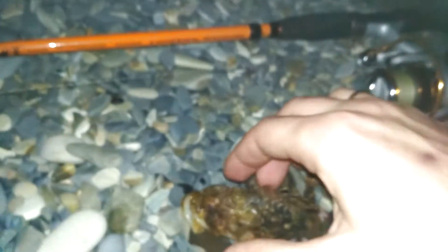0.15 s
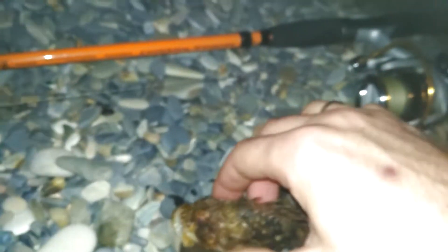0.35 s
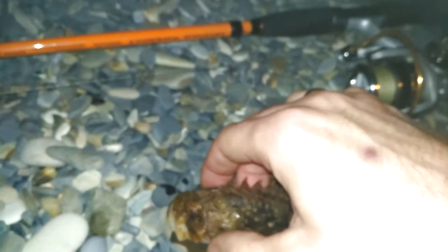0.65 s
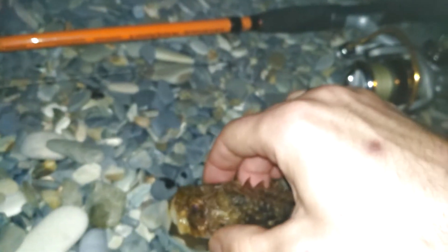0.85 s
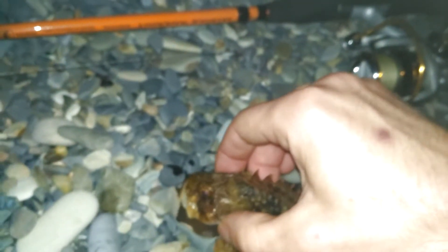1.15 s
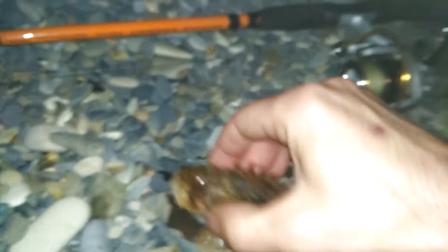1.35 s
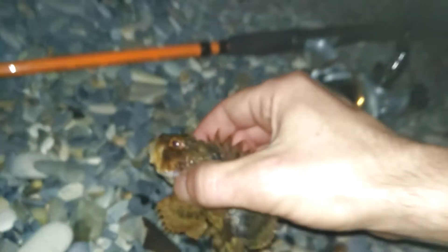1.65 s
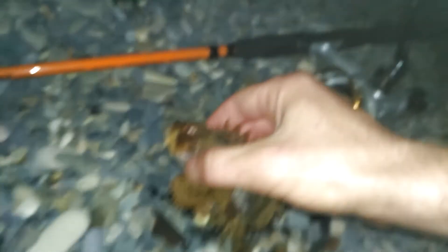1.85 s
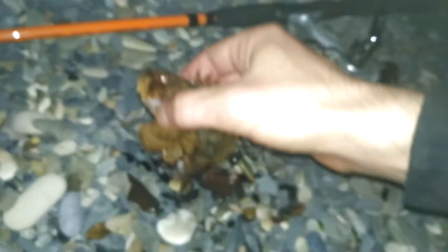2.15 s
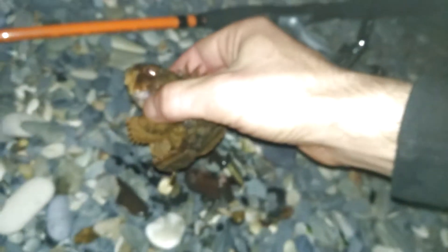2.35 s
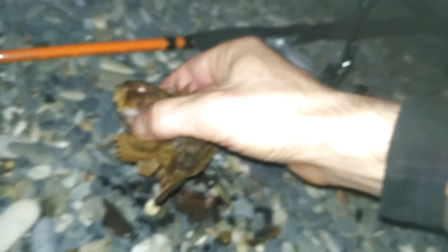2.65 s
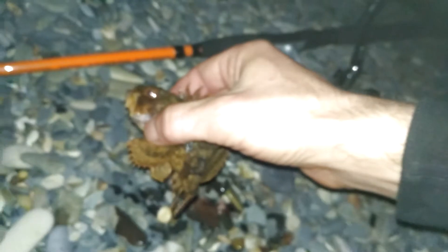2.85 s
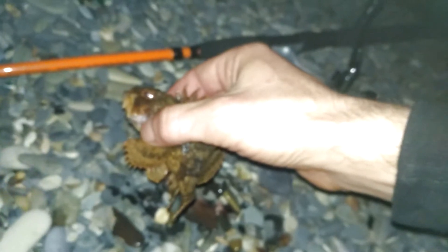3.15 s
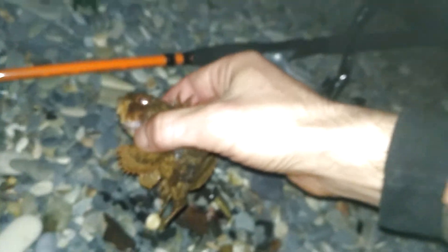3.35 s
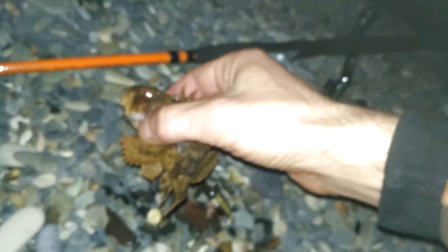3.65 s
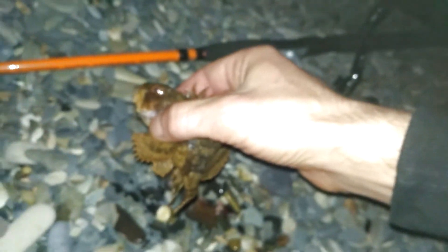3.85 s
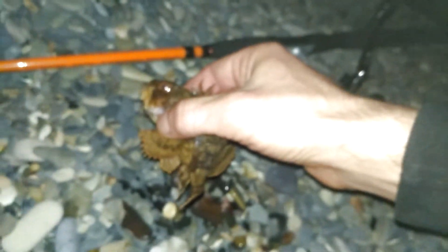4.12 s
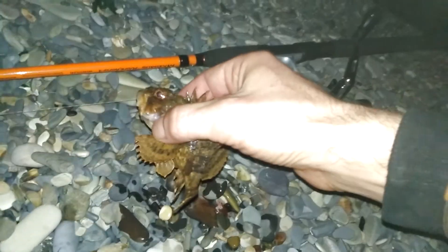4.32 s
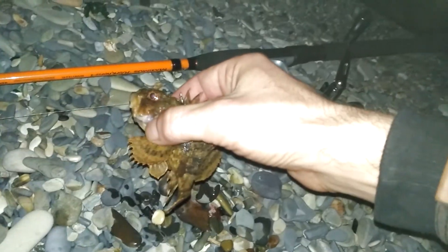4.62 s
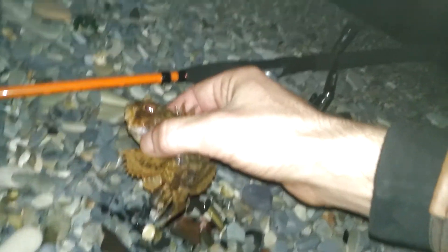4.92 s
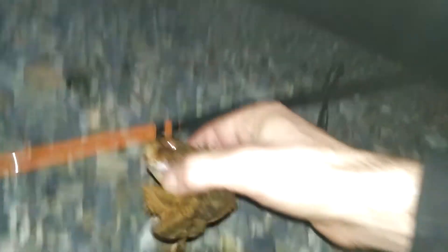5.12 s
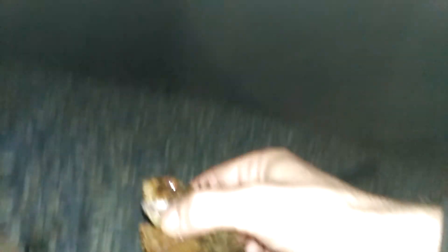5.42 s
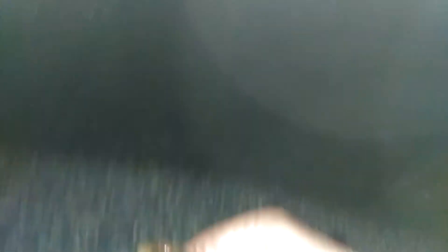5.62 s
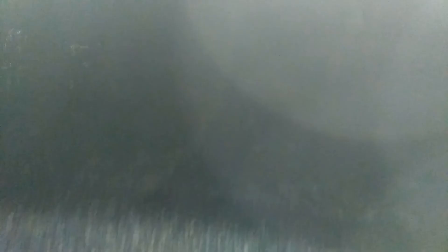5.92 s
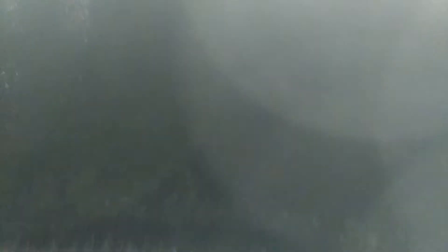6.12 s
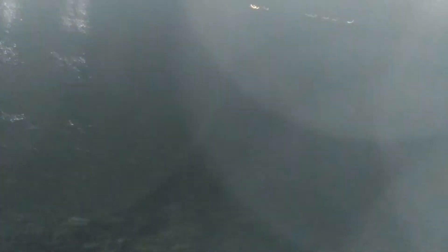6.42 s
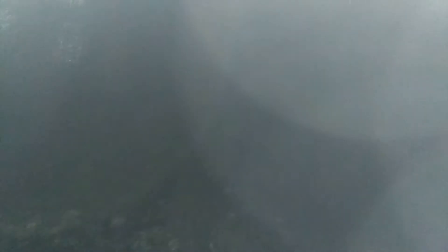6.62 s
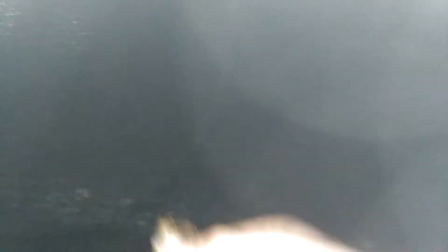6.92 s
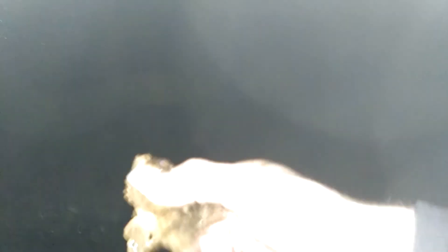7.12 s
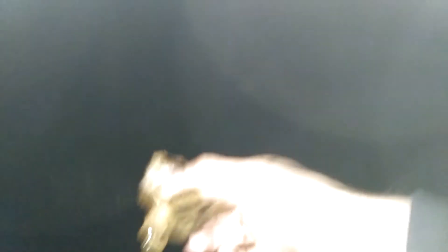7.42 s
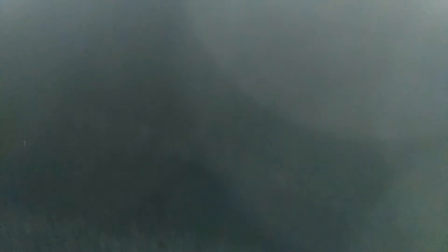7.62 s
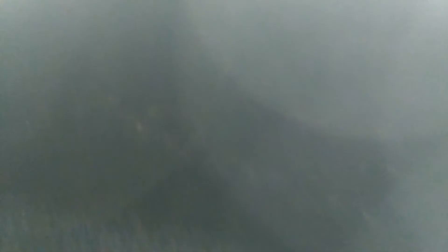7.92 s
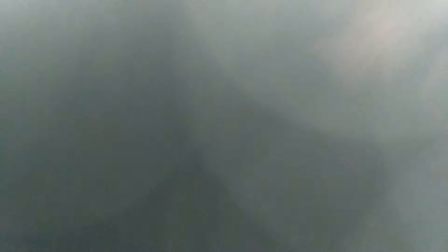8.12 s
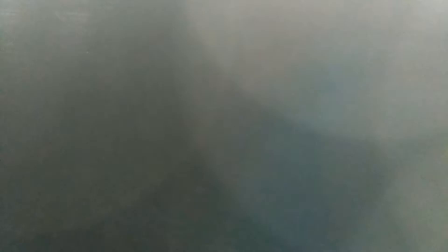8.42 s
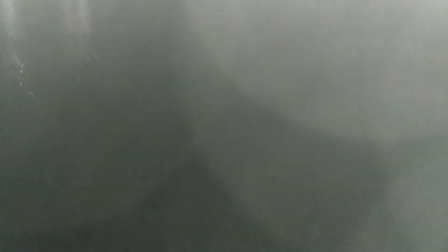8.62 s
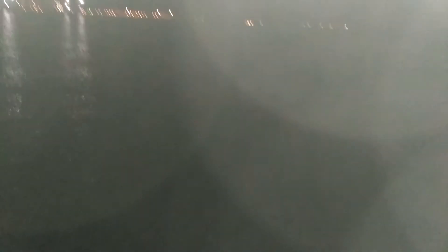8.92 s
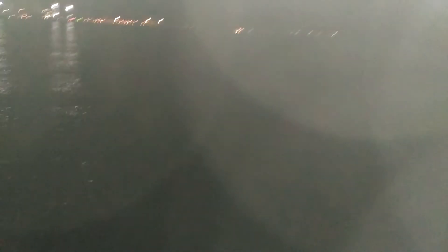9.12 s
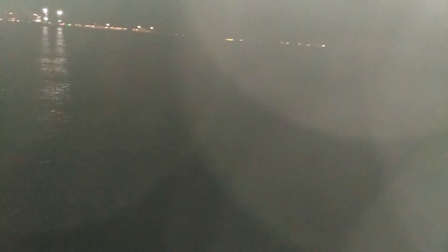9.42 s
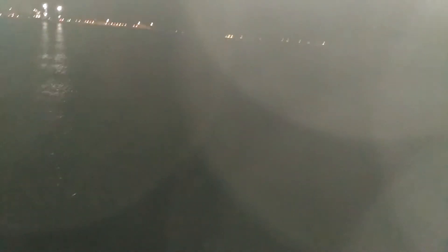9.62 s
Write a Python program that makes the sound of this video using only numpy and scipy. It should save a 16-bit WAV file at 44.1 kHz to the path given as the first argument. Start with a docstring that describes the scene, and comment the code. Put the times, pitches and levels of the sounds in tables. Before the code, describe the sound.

Small waves break close by and drain through pebbles, each a bright, crackling wash of foam with hollow clacks and bubbly plops. Quiet gaps between them hold faint far surf and a low breeze, thinned by noise suppression. The second wave is stronger; the last run is longest, with the heaviest wind bumps on the phone microphone outdoors, ending in a little splash.

```python
"""Night on a pebble beach, heard by a hand-held phone: small waves break and fizz away over steady far surf.
First come a little wash, some pebble ticks and a wave at 1.8 s; a lull, then a stronger wave at 4.5 s
rattles the stones. Puffs of wind bump the microphone, small splashes follow from 6.2 s, then a long run of
waves from 7.1 s with clacking stones and the strongest puffs; it ends on a few ticks and a splash.
Noise makes the water and ringing tones the stones; a noise suppressor holds down steady sound by band."""
import sys
import numpy as np
from scipy import signal
from scipy.fft import rfft, irfft, next_fast_len
from scipy.io import wavfile
from scipy.ndimage import uniform_filter1d, map_coordinates

SR = 44100
rng = np.random.default_rng(int(sys.argv[2]) if len(sys.argv) > 2 else 0)


def to_wav(s):
    """Save 16-bit WAV."""
    ch = np.atleast_2d(s).T  # columns
    pcm = np.round(np.clip(ch, -1, 1) * 32767)  # PCM
    wavfile.write(sys.argv[1], SR, pcm.astype(np.int16))


N = 430416

# Tone colours, each as (frequency [Hz], relative level [dB])
# far surf
SURF_COLOUR = [(150, -22.5), (250, -4), (547, -0.5), (748, -8.5), (1380, -15.5), (1500, -19.5), (2280, -19),
               (5250, -27.5), (7980, -23.5), (14400, -16.5), (16000, -46)]
# low rumble of the breeze
RUMBLE_COLOUR = [(15, -51.5), (25, -5), (75, 0), (134, -6), (172, -4.5), (263, -14), (286, -15), (400, -19),
                 (520, -56), (880, -120)]
# gurgling air pockets
GURGLE_COLOUR = [(220, -41), (330, -4), (600, 1.5), (800, -2.5), (1100, -15)]
# tumbling water
WASH_COLOUR = [(560, -47), (800, -7), (1200, 2), (1900, 2.5), (2700, -24.5)]
# dragged gravel
RATTLE_COLOUR = [(1400, -26), (2100, -2), (2700, -2.5), (3700, -3.5), (5000, -6), (6200, -11.5)]
# draining water
HISS_COLOUR = [(4500, -5), (5400, -0.5), (7000, -3), (9300, -0.5), (10000, -36.5)]
# foam
FIZZ_COLOUR = [(9000, -26), (9600, -0.5), (11000, 2), (11900, -0.5), (12500, -29)]
# finest foam
SPRAY_COLOUR = [(11500, -29.5), (12100, -2), (14000, -3), (16000, -5.5)]

# strength of the breeze: (time [s], rumble level [dB])
BREEZE_LEVEL = [(0.0, -62), (0.46, -63), (1.41, -60.5), (1.9, -61), (2.69, -61), (3.07, -61.5), (3.42, -59),
                (3.86, -63), (4.35, -58), (5.43, -57), (5.65, -61.5), (6.11, -56.5), (7.55, -63.5),
                (8.29, -57.5), (8.83, -63), (9.76, -62)]
# puffs on the microphone, played 2 dB lower: (time [s], level [dB], swing frequency [Hz])
WIND_PUFFS = [(2.95, -53.5, 73), (4.716, -56, 61.5), (4.817, -47.5, 72.7), (4.994, -49, 70.0),
              (5.265, -46.5, 71.6), (6.674, -43, 54), (8.135, -31, 68.2), (8.328, -52.5, 72.7),
              (8.392, -39.5, 67.5), (8.576, -31, 80.9), (8.689, -49.5, 59.2)]
# narrow hums and scrapes: (middle [s], level [dB], frequency [Hz], half length [s], half width [octaves])
HUMS = [(1.026, -71, 2350, 0.0303, .25), (1.594, -73, 5310, .04, .1), (2.927, -70.5, 1489, 0.124, 0.087),
        (6.259, -63, 2420, 0.043, 0.46), (6.42, -70.5, 5610, 0.051, .2), (6.754, -63.5, 3190, 0.0147, .3),
        (6.887, -69.5, 5600, 0.066, .2), (1.302, -66, 523.3, 0.148, 0.11), (2.887, -63, 751, 0.139, 0.16),
        (3.161, -65, 5640, 0.0422, 0.85), (4.197, -59, 189.6, 0.0945, 0.63), (5.25, -68, 3300, .13, .35),
        (5.595, -58, 259, 0.0427, 0.81), (6.049, -50.5, 315, 0.0564, 0.52),
        (6.364, -48.5, 349.3, 0.0524, 0.674), (7.112, -42.5, 2527, 0.0798, 0.7), (7.27, -54, 2700, .08, .5),
        (8.245, -46, 332.3, 0.0185, .8), (8.438, -52, 2895, 0.111, 0.56)]
# single bubbles: (time [s], peak level [dB], start frequency [Hz], end frequency [Hz], length [s])
BUBBLES = [(0.953, -57, 1950, 2160, 0.0137), (3.276, -58.5, 3260, 4260, 0.011),
           (4.3, -53.5, 946, 1417, 0.0158), (4.205, -47, 620, 527, 0.028), (7.96, -40, 1950, 2450, 0.0499),
           (8.168, -37, 2550, 2250, 0.0555), (3.47, -56, 900, 1018, .02), (3.63, -55.5, 1250, 1400, 0.02),
           (9.715, -49.5, 461, 499, 0.0293), (4.5, -36, 291.8, 343.5, 0.0348),
           (5.16, -51.5, 299.6, 337, 0.0317), (1.815, -40, 420, 560, 0.0492),
           (1.895, -44, 430, 433, 0.0308), (2.07, -42, 377, 560, 0.0307), (7.24, -45.5, 420, 430, 0.0298),
           (8.0, -39, 359, 405, 0.0273), (8.45, -51, 293, 384, 0.032), (9.21, -55.5, 1000, 1250, .03),
           (9.475, -58.5, 3300, 2900, .015), (8.99, -57.5, 1600, 2300, 0.014), (4.335, -50, 620, 800, 0.04),
           (4.02, -54.5, 810, 1120, 0.0261), (3.781, -43.5, 724, 2130, 0.029),
           (3.802, -45, 400, 520, 0.0584), (4.3, -53, 1312, 1900, 0.012),
           (4.086, -51.5, 3000, 3080, 0.0105), (5.2, -48, 579, 626, 0.0131),
           (4.406, -42.5, 1700, 2250, 0.024), (4.478, -36.5, 2400, 2700, 0.014),
           (4.332, -44.5, 2600, 3690, 0.015)]
# small stones: (time [s], peak level [dB], centre frequency [Hz])
SMALL_STONES = [(0.0459, -40.5, 7500), (0.0741, -41, 9050), (0.0908, -40.5, 9100), (0.177, -43.5, 11600),
                (1.108, -24.5, 8660), (1.119, -40.5, 9000), (1.125, -37, 8860), (1.138, -12.5, 10860),
                (1.1567, -33.5, 7000), (1.1633, -23.5, 9800), (1.1784, -45, 11260), (1.708, -36, 9530),
                (1.746, -35, 5050), (1.76, -27, 10760), (1.778, -35.5, 9100), (1.8105, -26.5, 12800),
                (3.6877, -48.5, 4900), (3.7483, -46, 5450), (3.767, -41.5, 5320), (3.971, -42.5, 5540),
                (4.0797, -41, 8850), (4.1978, -34, 8400), (4.459, -22, 10900), (4.4746, -16, 12400),
                (4.51, -17, 12500), (4.5405, -15, 11400), (6.2122, -39.5, 8000), (6.37, -48, 7000),
                (6.71, -44, 8000), (6.93, -45.5, 9000), (6.965, -43.5, 6500), (7.2655, -34, 12800),
                (7.432, -40, 5490), (7.531, -14.5, 11500), (7.534, -12.5, 10600), (7.5373, -19.5, 10500),
                (7.542, -21, 10030), (7.5494, -17, 11600), (7.657, -21, 10580), (7.8878, -16.5, 10020),
                (7.9457, -15, 11600), (8.0854, -21.5, 8000), (9.079, -41.5, 12800), (9.287, -20, 11020),
                (9.686, -33.5, 13100), (9.738, -26, 10400)]
# bigger stones and water pockets, played 2 dB lower: (time [s], level [dB], starting ring frequency [Hz])
BIG_STONES = [(0.043, -46.5, 759.5), (0.132, -48.5, 1263), (1.755, -32, 3260), (1.797, -46.5, 1118),
              (1.885, -28.5, 3936), (1.915, -28.5, 4190), (1.958, -33.5, 1050), (2.01, -33.5, 3420),
              (2.029, -30, 3570), (2.178, -35.5, 1308), (2.24, -33.5, 895), (3.478, -56, 3600),
              (3.687, -47.5, 1437), (3.717, -52, 1400), (3.741, -52.5, 1304), (3.97, -45, 1780),
              (3.995, -50, 2400), (4.05, -48, 1510), (4.132, -50, 1720), (4.166, -43.5, 3690),
              (4.198, -38, 1592), (4.299, -45, 1560), (4.318, -46, 1500), (4.378, -27.5, 2404),
              (4.476, -26.5, 755.6), (4.54, -21, 693.4), (6.209, -38.5, 3084), (7.079, -29.5, 2297),
              (7.4, -33, 737), (7.475, -27.5, 1130), (7.531, -25.5, 588.8), (7.643, -36, 1188),
              (7.697, -35.5, 1374), (7.77, -33.5, 1100), (7.886, -24.5, 2481), (7.945, -19.5, 3890),
              (7.995, -29, 940.5), (8.067, -30.5, 1815), (8.089, -27.5, 888), (8.18, -33, 775.5),
              (8.229, -31.5, 1494), (8.26, -29.5, 1997), (9.282, -38, 2300), (9.713, -35.5, 1687)]
# water lapping between the waves, before each layer's offset:
# (time [s], low lapping level [dB], fine seething level [dB])
LAPPING_LEVELS = [(0, -70.5, -74.5), (.8, -79, -85.5), (1.4, -72.5, -89), (1.7, -71, -77),
                  (2.6, -68.5, -82), (3.5, -73, -74.5), (4.2, -68, -68.5), (5.4, -72.5, -71.5),
                  (6.0, -71.5, -71), (6.5, -71.5, -68.5), (6.9, -68.5, -67.5), (7.4, -57, -71),
                  (8.7, -72, -71.5), (9.3, -73, -68.5), (9.76, -66.5, -69)]
# waves, their backwash and small splashes, before the factors for each layer below:
# (crest [s], rise [s], hold [s], drain [dB/s], then crest levels of gurgle [dB], wash [dB], rattle [dB],
# hiss [dB], fizz [dB], spray [dB])
WAVE_SURGES = [(0.038, 0.063, 0.0157, 96.5, -68.5, -66.5, -66.5, -66, -66.5, -72),
               (1.775, 0.0444, 0.4877, 89.5, -52.5, -47, -47.5, -51, -48.5, -49.5),
               (2.038, 0.38, 0.174, 90, -59, -54, -48.5, -52.5, -55.5, -58),
               (2.328, 0.213, 0.1056, 72.5, -84, -59.5, -63, -58, -59, -60),
               (3.658, 0.053, 0.088, 89, -75, -66.5, -71.5, -78.5, -85.5, -77.5),
               (3.785, 0.05, 0.0227, 91.5, -61, -57, -76, -71.5, -83.5, -79.5),
               (3.99, 0.063, 0.084, 76, -65, -60, -66, -63, -79.5, -69.5),
               (4.2, 0.021, 0.142, 70, -64, -67, -67.5, -56.5, -74, -55),
               (4.405, 0.139, 0.126, 65, -73, -53, -53, -50, -54.5, -48),
               (4.503, 0.0906, 0.27, 51.5, -40, -37.5, -41.5, -43.5, -41, -41.5),
               (4.915, 0.43, 0.137, 58, -78, -77.5, -51.5, -50.5, -64, -73),
               (6.205, .03, 0.126, 72.5, -74.5, -83.5, -71.5, -71.5, -67, -67),
               (6.615, 0.082, 0.0157, 92.5, -66.5, -63.5, -72, -80.5, -71, -72),
               (6.931, 0.12, 0.045, 77, -75, -58, -67, -71, -75.5, -69.5),
               (7.079, 0.1015, 0.1608, 93, -49, -47.5, -51, -64, -70, -75.5),
               (7.457, 0.177, 0.078, 80, -49, -47, -56, -63, -62.5, -67.5),
               (7.529, 0.0039, 0.0088, 112.5, -62.5, -45, -47, -40, -33.5, -36),
               (7.637, 0.076, 0.54, 67, -58.5, -47.5, -50, -46, -45, -64),
               (7.889, 0.14, 0.39, 78.5, -51, -41.5, -43, -42.5, -42, -43.5),
               (8.28, 0.61, 0.08, 79.5, -83, -57, -48.5, -45, -42.5, -45),
               (9.72, 0.059, 0.11, 73, -57, -71.5, -57.5, -51.5, -55, -47)]
# how late each layer crests; big air pockets burst later than the foam:
# (gurgle [s], wash [s], rattle [s], hiss [s], fizz [s], spray [s])
LAYER_LAG = [0.0435, 0.018, 0.0056, .001, 0.00107, 0.00105]
# hold of each layer over the hold of the surge:
# (gurgle [ratio], wash [ratio], rattle [ratio], hiss [ratio], fizz [ratio], spray [ratio])
LAYER_HOLD = [0.74, 0.92, 0.93, 0.99, 1.01, 1.12]
# speed of each layer's fall over the drain of the surge:
# (gurgle [ratio], wash [ratio], rattle [ratio], hiss [ratio], fizz [ratio], spray [ratio])
LAYER_DRAIN = [2.84, 1.263, 0.982, 1.118, 1.566, 2.6]
# lower halves of wash, then rattle, which die first: (upper edge [Hz], hold [ratio], drain [ratio])
LOWER_HALVES = [(1250, 0.8, 1.8), (2500, 0.92, 1.15)]
# edges of the noise suppressor's bands: (frequency [Hz])
BAND_EDGES = [300, 400, 510, 630, 770, 920, 1080, 1270, 1480, 1720, 2000, 2320, 2700, 3150, 3700, 4400,
              5300, 6400, 7700, 9500, 12000, 17000]

SURF_DB = -64
RISE_DB, SAG_DB_PER_S = 20, 5.5  # a surge climbs this far in its rise time, then sags while it holds
CLACK_T60_S, CLACK_DAMPING = 0.0545, 0.672  # time to fall 60 dB at 1 kHz; it shortens as pitch to this power
# hiss let through for a moment after a tick, as the suppressor's bands stay open; each layer takes a share
TICK_HISS_DB, TICK_HISS_GROWS = -53, 0.695  # level for a 0 dB tick [dB], change per dB of tick [dB]
TICK_HISS_S, TICK_HISS_DB_PER_S = 0.051, 220.5  # its hold and its fall
TOP_HZ = 15780  # nothing above this gets through the phone


def amp(db):
    """Gain of a level in dB."""
    return 10 ** (np.asarray(db) / 20)


def unit(x):
    """The same sound brought to an average strength (rms) of 1."""
    return x / np.sqrt(np.mean(x ** 2) + 1e-20)


def curves(rows):
    """One value per sample for each column after the time."""
    s, *cols = np.transpose(rows)
    return [np.interp(np.arange(N) / SR, s, c) for c in cols]


def wobble(rate):
    """A smooth random curve through rate random points a second."""
    knots = rng.standard_normal(int(N * rate / SR) + 4)
    return map_coordinates(knots, [np.arange(N) * rate / SR])


def coloured(x, spectrum):
    """Filter a sound by joining tone-colour points on a log frequency axis, then bring it to rms 1."""
    m = next_fast_len(N + 8192)
    f, db = np.transpose(spectrum)
    log_hz = np.log(np.fft.rfftfreq(m, 1 / SR) + 1)  # the 1 avoids log of zero
    gain = amp(np.interp(log_hz, np.log(f), db, -120, -120))
    return unit(irfft(rfft(x, m) * gain, m)[:N])


def bandpass(x, low_hz, high_hz):
    """Keep mainly what lies between two frequencies."""
    return signal.sosfilt(signal.butter(2, [low_hz, high_hz], "band", fs=SR, output="sos"), x)


def patchy(patchy_db):
    """White noise with patches of random gain in time and frequency."""
    z = signal.stft(rng.standard_normal(N), nperseg=512)[2]
    field = uniform_filter1d(rng.standard_normal(z.shape), size=8, axis=0)
    field = uniform_filter1d(field, size=6, axis=1)
    return unit(signal.istft(z * amp(patchy_db * unit(field)), nperseg=512)[1][:N])


def grains(count, centre_hz, octaves, cycles, spread_db, size):
    """Dying tones at random moments and strengths, rising a little like bubbles."""
    start = rng.random(count)
    strength = np.minimum(rng.standard_normal(count), 2)
    hz = centre_hz * 2 ** (octaves * rng.standard_normal(count))
    hz = np.clip(hz, 200, SR / 2.5)[:, None]
    k = np.arange(size)
    turns = hz * k / SR
    tone = np.sin(2 * np.pi * turns * (1 + 0.0922 * turns / cycles))
    shape = amp(spread_db * strength)[:, None] * tone * np.exp(-turns / cycles)
    at = (start * N).astype(int)[:, None] + k
    return unit(np.bincount(at.ravel(), shape.ravel(), N + size)[:N])


def halves(x, hz, low_gain, high_gain):
    """Split a sound at hz and give each half its own gain."""
    high = signal.sosfiltfilt(signal.butter(2, hz, "high", fs=SR, output="sos"), x)
    return low_gain * (x - high) + high_gain * high


def add(out, s, sound):
    """Mix a sound in at s seconds."""
    part = out[round(s * SR):][:len(sound)]
    part += sound[:len(part)]


def far_surf():
    """Many distant waves blur into a steady, slightly patchy hiss."""
    return amp(SURF_DB + 0.39 * wobble(2.64)) * coloured(patchy(patchy_db=3.0), SURF_COLOUR)


def breeze():
    """Moving air makes a low rumble that swells in irregular lumps."""
    lumps_db = 2.44 * wobble(20) + 1.31 * wobble(3.002)
    rumble = unit(amp(lumps_db) * coloured(rng.standard_normal(N), RUMBLE_COLOUR))
    return amp(curves(BREEZE_LEVEL)[0]) * rumble


def wind_puffs():
    """A puff swings the microphone's diaphragm for two or three cycles."""
    out, t = np.zeros(N), np.arange(SR // 10) / SR - .024
    for s, db, hz in WIND_PUFFS:
        swing = np.cos(2 * np.pi * hz * t) * np.exp(-(t / 0.0193) ** 2)
        crest = 1.23 * np.exp(-(t / 0.001796) ** 2)
        rebound = .5 * np.exp(-((t - .005) / 0.002) ** 2)
        add(out, s, -amp(db - 2.0) * (swing + crest - rebound))
    return out


def hums_and_scrapes():
    """Narrow bands of noise swell and fade briefly, heard as hums and scrapes."""
    out, t = np.zeros(N), np.arange(N) / SR
    for s, db, hz, half, octaves in HUMS:
        band = [(hz * 2 ** -octaves, -20), (hz, 0), (hz * 2 ** octaves, -20)]
        hum = coloured(rng.standard_normal(N), band)
        out += amp(db) * hum * np.exp(-((t - s) / half) ** 4)
    return out


def plops():
    """A bubble near the surface rings unevenly while its pitch glides."""
    out = np.zeros(N)
    for s, db, start_hz, end_hz, length in BUBBLES:
        u = np.arange(round(length * SR)) / (length * SR)  # 0 to 1 through the bubble
        hz = start_hz + (end_hz - start_hz) * u
        drift = np.cumsum(rng.normal(0, .1, SR // 10))[:len(u)]
        ring = np.sin(2 * np.pi * np.cumsum(hz) / SR + drift)
        add(out, s, amp(db) * np.sin(np.pi * u ** 0.65) * ring)
    return out


def pebble_ticks():
    """Small stones give a bright crack: a very short burst of noise around one pitch."""
    out, t = np.zeros(N), np.arange(SR // 8) / SR
    for s, db, hz in SMALL_STONES:
        fade = amp(-60 * t / 0.00786) + 0.025 * amp(-60 * t / 0.062)  # quick fade with a faint tail
        burst = rng.standard_normal(len(t)) * fade * (1 - np.exp(-t / 0.000408))
        body = bandpass(burst, 2000, 1.68 * hz)
        crack = bandpass(burst, 0.725 * hz, min(1.35 * hz, .45 * SR)) + 0.12 * body
        add(out, s, amp(db) * crack / np.abs(crack).max())
    return out


def stone_clacks():
    """Bigger stones and water pockets give a dry snap and a short hollow ring."""
    out, t = np.zeros(N), np.arange(SR // 8) / SR
    for s, db, hz in BIG_STONES:
        t60 = CLACK_T60_S * (1000 / hz) ** CLACK_DAMPING
        phase = 2 * np.pi * hz * t * (1 + 3 * t)  # pitch climbs
        drift = np.cumsum(rng.normal(0, 0.17, len(t)))  # irregular shapes ring impurely
        ring = np.sin(phase + drift) + 0.254 * np.sin(1.7 * phase + drift)
        ring = amp(-60 * t / t60) * (1 - np.exp(-t / 0.0009)) * ring
        contact = bandpass(rng.standard_normal(len(t)), 0.416 * hz, 2.44 * hz)
        snap = 0.85 * amp(-60 * t / 0.0045) * contact / contact.std()  # stone on stone
        add(out, s, amp(db - 2.0) * (ring + snap))
    return out


def layer(surges, rest_db):
    """Gain of one layer: every (crest, rise, hold, drain, dB) climbs, sags and drains away over the rest."""
    t, power = np.arange(0, N, 32) / SR, 0
    for crest, rise, hold, drain_db_per_s, db in surges:
        late = np.maximum(t - crest, 0)
        climb_db = RISE_DB * np.maximum(crest - t, 0) / rise
        sag_db = SAG_DB_PER_S * np.minimum(late, hold)
        drained_db = drain_db_per_s * np.maximum(late - hold, 0)
        power = power + amp(2 * (db - climb_db - sag_db - drained_db))
    return np.sqrt(np.interp(np.arange(N) / SR, t, power) + amp(2 * rest_db))


def wave_gains():
    """Gains of the six water layers, then of the lower halves of wash and rattle."""
    low_db, fine_db = curves(LAPPING_LEVELS)
    crest, rise, hold, drain_db_per_s, *levels_db = np.transpose(WAVE_SURGES)
    rests_db = [low_db + 1.0, low_db + 2.0, (low_db + fine_db) / 2, fine_db, fine_db, fine_db + 1.0]

    def surging(k, hold_ratio, drain_ratio):
        """Gain of layer k with its own lag, hold and fall."""
        surges = zip(crest + LAYER_LAG[k], rise, hold * hold_ratio, drain_db_per_s * drain_ratio, levels_db[k])
        return layer(surges, rests_db[k])

    main = [surging(k, LAYER_HOLD[k], LAYER_DRAIN[k]) for k in range(6)]
    lower = [surging(k, held, drain) for k, (hz, held, drain) in enumerate(LOWER_HALVES, 1)]
    return main + lower


def waves():
    """Each layer is rushing noise with bubbles or stone contacts on it; all surge together."""
    gurgle, wash, drag, hiss, fizz, spray, deep, heavy = wave_gains()
    tick_hiss = layer([(s, .008, TICK_HISS_S, TICK_HISS_DB_PER_S, TICK_HISS_DB + TICK_HISS_GROWS * db)
                       for s, db, hz in SMALL_STONES], -120)
    flicker = 0.47 * wobble(30) + 1.614 * wobble(90)  # shared by all layers, each takes a part

    bubbles = grains(count=5000, centre_hz=1004.9, octaves=0.8966, cycles=3.83, spread_db=5, size=800)
    knocks = grains(count=7000, centre_hz=3300, octaves=0.45, cycles=3.5, spread_db=4.5, size=250)
    pops = grains(count=4000, centre_hz=10594, octaves=.4, cycles=4.7, spread_db=4.0, size=80)
    water = patchy(patchy_db=2.0) + 0.48 * bubbles
    gravel = patchy(patchy_db=1.5) + 0.371 * knocks
    foam = patchy(patchy_db=1.7) + 0.388 * pops

    low = gurgle * amp(1.83 * wobble(20)) * coloured(water, GURGLE_COLOUR)
    low += halves(coloured(water, WASH_COLOUR), LOWER_HALVES[0][0], deep, wash)
    rattle = halves(coloured(gravel, RATTLE_COLOUR), LOWER_HALVES[1][0], heavy, drag)
    high = (hiss + 0.59 * tick_hiss) * coloured(foam, HISS_COLOUR)
    high += (fizz + tick_hiss) * coloured(foam, FIZZ_COLOUR)
    high += (spray + 0.89 * tick_hiss) * coloured(foam, SPRAY_COLOUR)
    return amp(0.45 * flicker) * low + amp(0.866 * flicker) * rattle + amp(0.4 * flicker) * high


def scene():
    """Everything at the one microphone."""
    air = far_surf() + breeze() + wind_puffs() + hums_and_scrapes()
    beach = plops() + pebble_ticks() + stone_clacks() + waves()
    return (air + beach)[None]


def suppress(x, margin_db, depth_db, knee, release_db):
    """Turn each band down while it stays near its quiet level; shut slowly (dB a second) after a loud sound."""
    hz, t, z = signal.stft(x, SR, nperseg=512, noverlap=384)
    gain = np.ones(z.shape)
    for lo, hi in zip(BAND_EDGES, BAND_EDGES[1:]):
        rows = (hz >= lo) & (hz < hi)
        frames = 5 + 60 // rows.sum()  # narrow bands average longer
        power = uniform_filter1d(np.mean(np.abs(z[rows]) ** 2, axis=0), size=frames)
        level_db = 10 * np.log10(power + 1e-20)
        # follows rises at once, falls no faster than the release
        held_db = np.maximum.accumulate(level_db + release_db * t) - release_db * t
        quiet_db = np.percentile(held_db, 25)
        over = amp(knee * (held_db - quiet_db - margin_db))
        gain[rows] = uniform_filter1d(amp(-depth_db / (1 + over)), size=5)
    return signal.istft(z * gain, SR, nperseg=512, noverlap=384)[1][:N]


def record(dry):
    """Noise suppression, the bass cut of the small microphone, then the phone's band limit."""
    m = next_fast_len(N + 8192)
    hz = np.fft.rfftfreq(m, 1 / SR)
    x = suppress(dry[0], margin_db=3.5, depth_db=11.5, knee=1.13, release_db=213.0)
    bass_cut = 1 - 1 / (1 + (hz / 36) ** 8)
    return irfft(rfft(x, m) * bass_cut * (hz < TOP_HZ), m)[None, :N]


dry = scene()
out = record(dry)
to_wav(out)
```